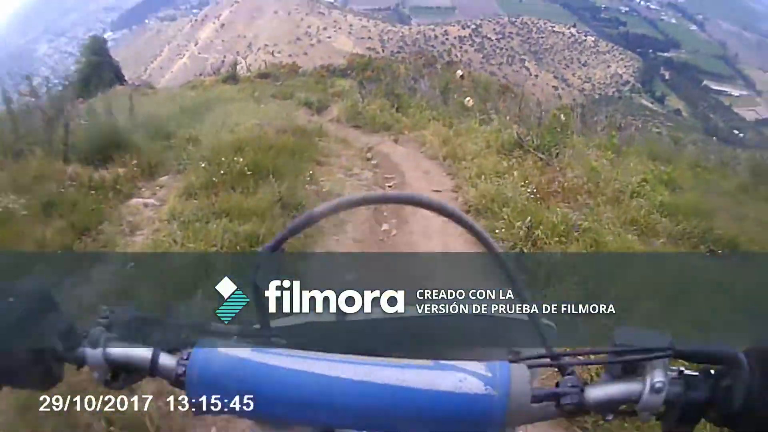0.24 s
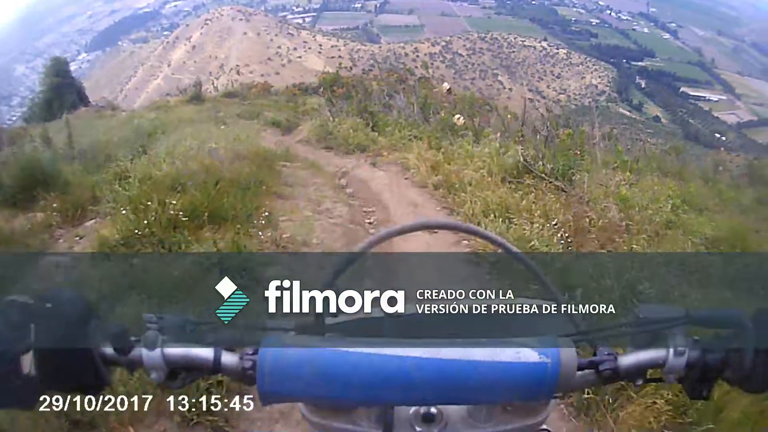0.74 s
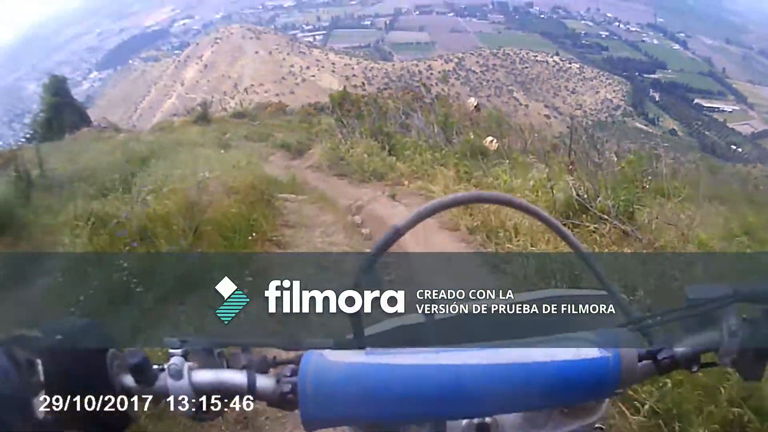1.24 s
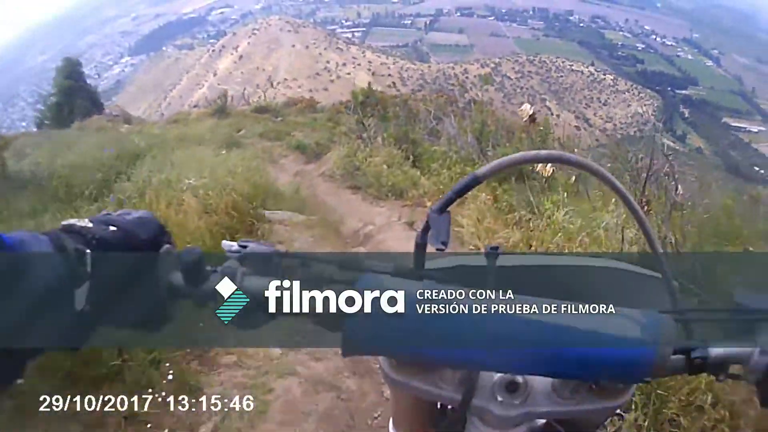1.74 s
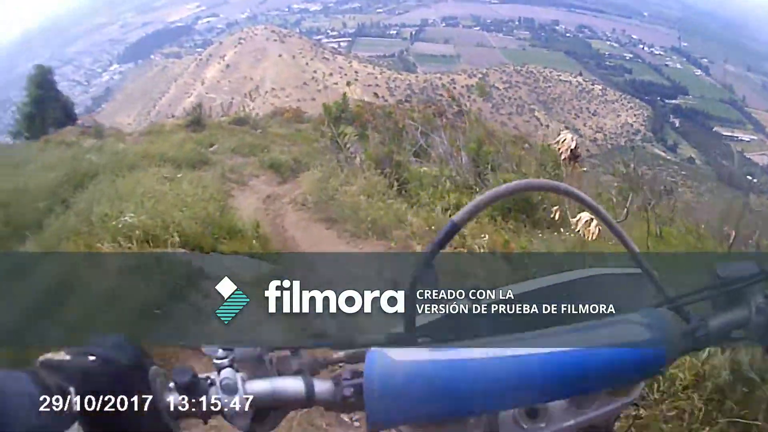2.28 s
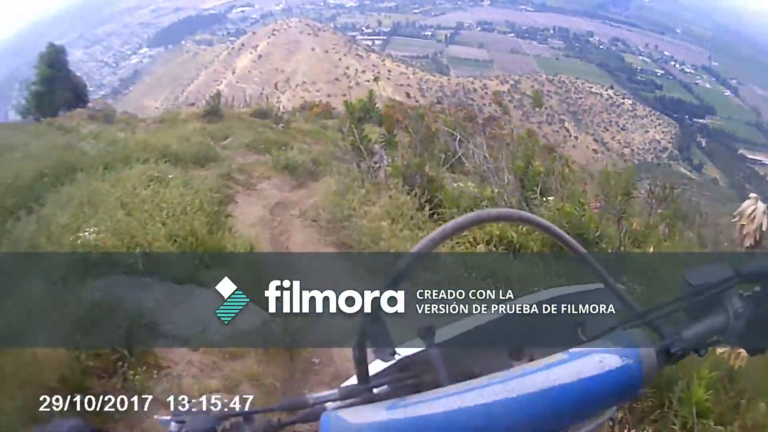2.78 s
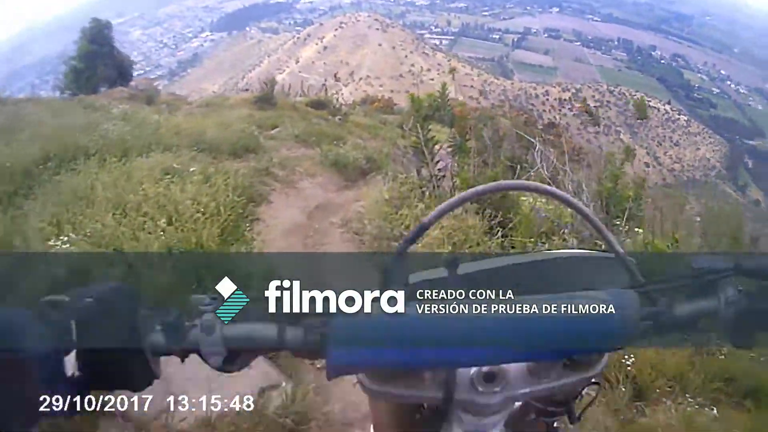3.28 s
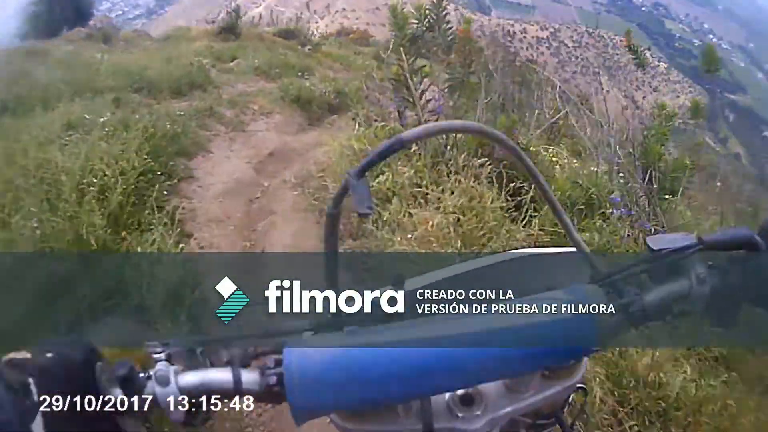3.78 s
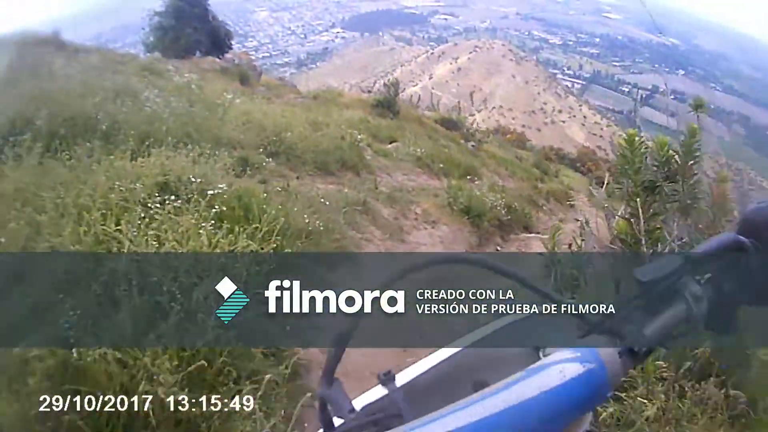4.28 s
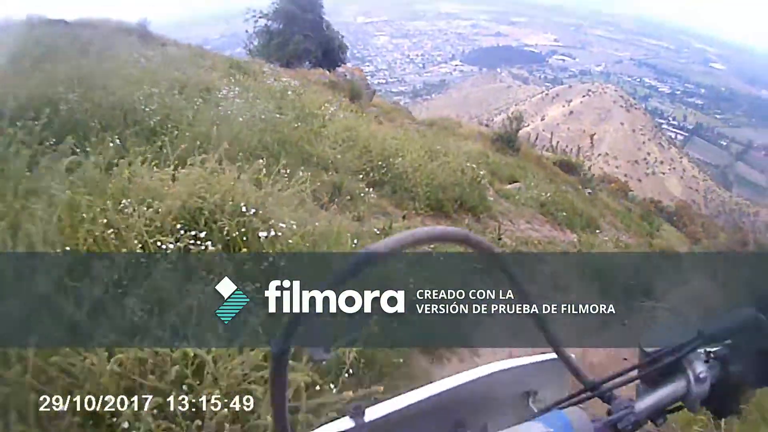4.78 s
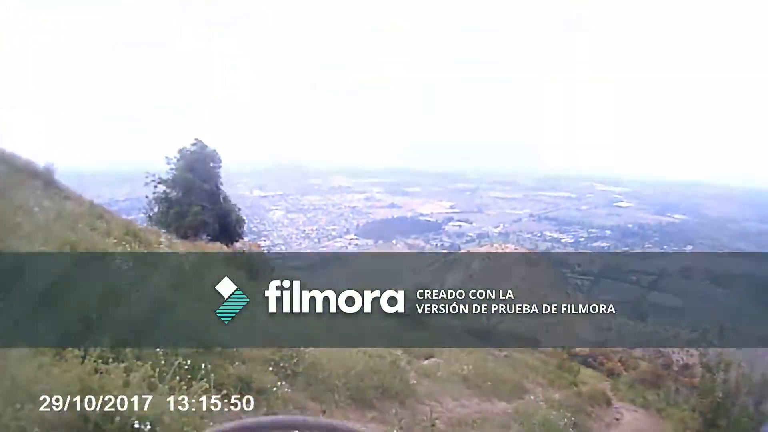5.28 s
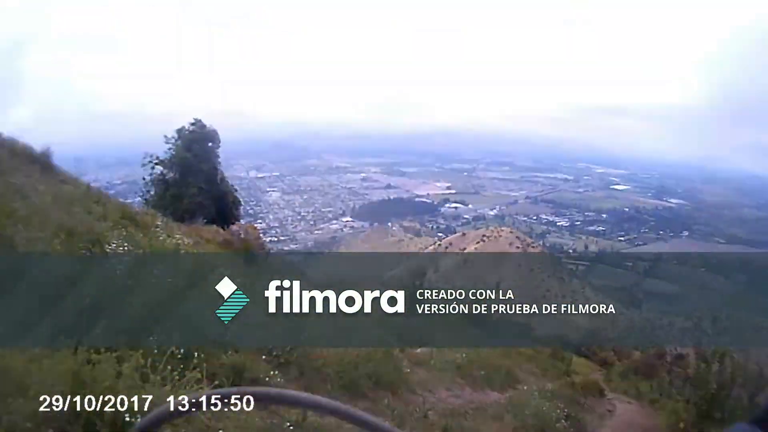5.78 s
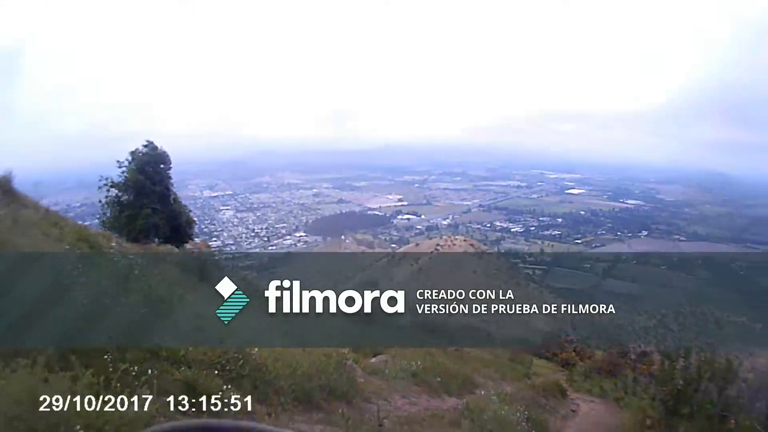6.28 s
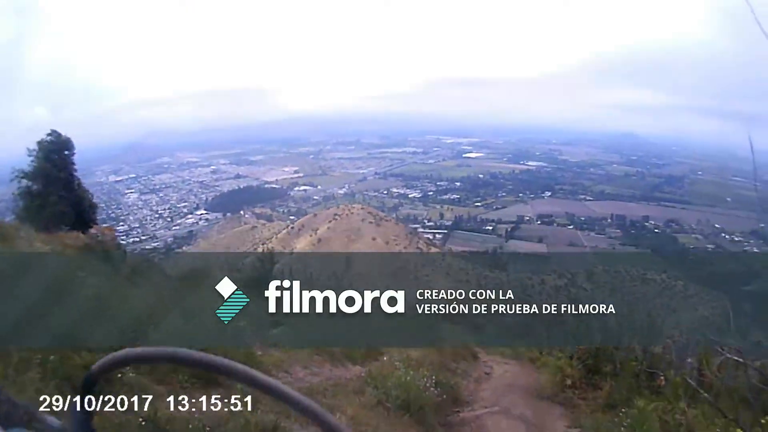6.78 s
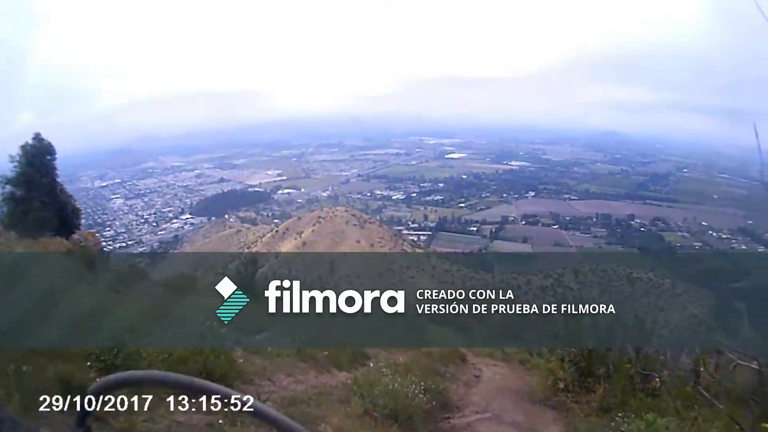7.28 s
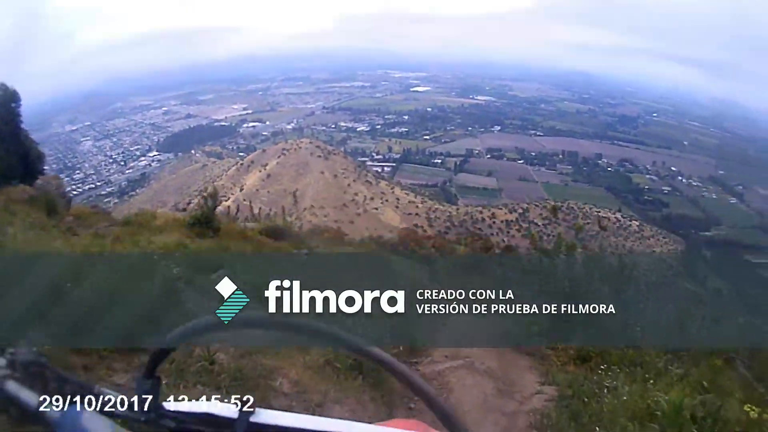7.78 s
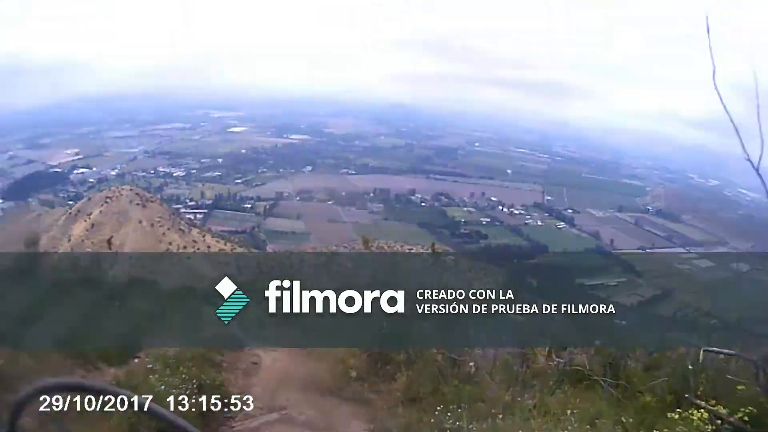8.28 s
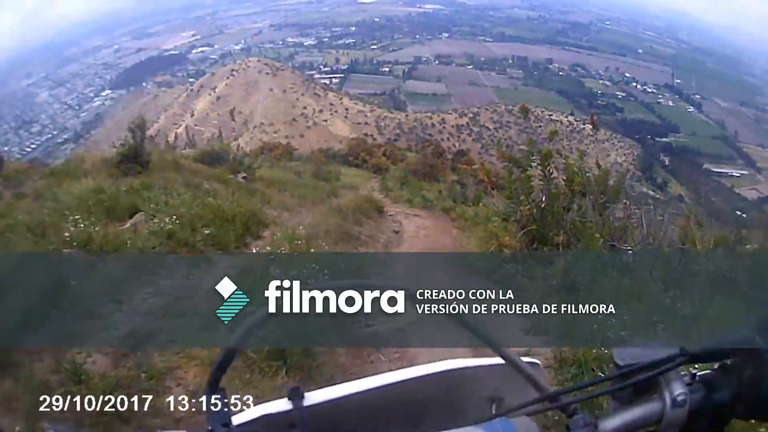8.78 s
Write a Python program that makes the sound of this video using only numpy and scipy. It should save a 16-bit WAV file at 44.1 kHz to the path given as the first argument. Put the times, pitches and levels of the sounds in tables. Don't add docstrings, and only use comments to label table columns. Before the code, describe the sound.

A single-cylinder dirt bike putters at idle down a rough outdoor trail, picked up closely through a sealed plastic camera case. Throughout, about eighteen low exhaust thuds per second wander slightly and sometimes weaken, under boxy, metallic valve clatter, low mount rumble and soft hiss. Light ticks and a strap scuff begin at 0.1 s; snaps at 0.63 s lead to the loudest crack and deep thump at 0.77 s. From 1 to 2 s there are scuffs, ticks and short squeaks. A bump at 2.3 s knocks and chirps; a duller landing comes at 2.9 s. From 3 to 5 s it is calmer, mostly engine with small jolts. At 5.3 s a heavy thump and sharp double knock hit. A small squeak at 6.05 s and a milder bump near 6.5 s follow, then frequent light ticks and rubs from 7.4 s until the end at 9 s, engine still running.

```python
import sys
import numpy as np
from scipy import signal
from scipy.fft import rfft, irfft, next_fast_len
from scipy.io import wavfile
from scipy.ndimage import uniform_filter1d

SR = 44100
rng = np.random.default_rng(int(sys.argv[2]) if len(sys.argv) > 2 else 0)


def store_pcm(level_fs):
    pcm = np.round(np.clip(level_fs, -1, 1) * 32767).astype(np.int16)
    wavfile.write(sys.argv[1], SR, np.atleast_2d(pcm).T)


def nominal_scale(level):
    x = np.asarray(level, float) / 20
    return 10 ** x


N = 398663

# pitch in Hz, width in Hz, level in dB.
CASE_TONES = [(540, 470, -6), (970, 340, -4.5), (1180, 187, 5), (1390, 690, -4), (1880, 198, 6),
              (2153, 610, -5.5), (3107, 226, -13.5), (3610, 490, -17.5), (3943, 310, -14), (4810, 300, -20),
              (6160, 910, -31)]
# time in seconds, level in dB, extra brightness in dB.
CLATTER_COURSE = [(0.0, -66, 2.5), (0.88, -64, 4.5), (1.36, -66, 3), (1.76, -64, 4), (2.04, -67, 1),
                  (2.29, -64, -1), (2.54, -68.5, 3), (3.95, -67.5, 4), (4.23, -68.5, 4.5), (5.03, -67, 4.5),
                  (5.21, -65.5, 4), (5.89, -65.5, 3), (6.42, -63.5, 3.5), (6.77, -66, 3),
                  (7.85, -63.5, 1.5), (8.38, -65.5, 5), (9.04, -65, 3)]


def read(points, hz):
    f, value = np.transpose(points)
    return np.interp(np.log(hz + 1), np.log(f + 1), value)


def curves(table):
    s, *columns = np.transpose(table)
    return [np.interp(np.arange(N) / SR, s, column) for column in columns]


def evened(x):
    return x / np.sqrt(np.mean(x ** 2) + 1e-20)


def noise(spectrum):
    size = next_fast_len(N)
    white = rfft(rng.standard_normal(size))
    gain = nominal_scale(read(spectrum, np.fft.rfftfreq(size, 1 / SR)))
    return evened(irfft(white * gain, size)[:N])


def add(mix, s, sound):
    part = mix[max(round(s * SR), 0):][:len(sound)]
    part += sound[:len(part)]


def resonate(x, hz, width):
    r, turn = np.exp(-np.pi * width / SR), np.exp(2j * np.pi * hz / SR)
    return 2 * signal.lfilter([1 - r], [1, -r * turn], x).real


def resonate_twice(x, hz, width, second_width):
    return resonate(resonate(x, hz, width), hz, second_width)


def case(x, low_db, high_db):
    out = 0
    for k, (hz, width, db) in enumerate(CASE_TONES):
        weight_db = low_db if hz < 2700 else high_db
        out = out + (-1) ** k * nominal_scale(db + weight_db) * resonate_twice(x, hz, width, width)
    return out


def crank():
    # time in seconds, firings per second, firing strength in dB.
    idle = [(0, 18.444, .5), (.506, 18.208, 2), (1.109, 19.034, .5), (2.102, 18.055, .5),
            (2.328, 19.371, -.5), (2.603, 18.416, -1), (3.126, 17.858, -.5), (3.926, 19.125, -.5),
            (4.655, 17.561, .5), (5.036, 19.365, 0), (5.457, 18.305, -.5), (5.57, 18.892, 0),
            (6.62, 18.55, 1), (6.665, 18.245, 1), (7.629, 19.3, -.5), (8.36, 17.713, 0), (8.534, 19.398, 0),
            (9.04, 18.565, .5)]
    rate, strength_db = curves(idle)
    return -1.147 + np.cumsum(rate) / SR, strength_db


def exhaust(spread_db=1., lead_s=0.0029):
    # firing number, change in dB.
    misfires = [(1, -16), (27, -22), (40, -9), (47, -5), (58, -4), (63, -4), (70, -4), (81, -5), (96, -4),
                (104, -9), (121, -25), (125, -3), (148, -22)]
    # pitch in Hz, level in dB, time to fade by 60 dB in seconds,
    # direction of the first swing (+1 or -1), arrival delay in seconds.
    pipe = [(65, -53, .15, -1, .004), (88, -46, .095, 1, .003), (214, -51, .047, 1, .0007),
            (311, -46, .09, -1, .0011), (336, -45, .05, -1, .0002), (500, -65, .06, -1, -.013)]
    count, firing_db = crank()
    s, k = np.arange(N) / SR, np.arange(np.ceil(count[0]), count[-1])
    weakness = dict(misfires)
    strength_db = np.interp(k, count, firing_db) + np.array([weakness.get(int(n), 0) for n in k])
    firing_s = np.interp(k, count, s) - lead_s
    t = np.arange(SR // 5) / SR
    low, high = np.zeros((2, N))
    for hz, db, t60, direction, delay in pipe:
        kicks = np.zeros(N)
        at = np.clip((firing_s + delay) * SR, 0, N - 1).astype(int)
        kicks[at] = nominal_scale(strength_db + spread_db * rng.standard_normal(len(k)))
        fade = direction * nominal_scale(db + 0.76 - 60 * t / t60)
        ring = fade * (1 - np.exp(-t / 0.00014)) * np.sin(2 * np.pi * hz * t)
        part = high if hz > 400 else low
        part += signal.oaconvolve(kicks, ring)[:N]
    muffler = signal.butter(3, 410, fs=SR, output="sos")
    return signal.sosfiltfilt(muffler, low) + high


def clatter(grains_per_s=3500, grain_db=0.9, flutter_db=1.0, patch_db=1.6):
    # share of the cycle after the exhaust thud, level in dB.
    valves = [(0, -5.5), (.15, -4), (.35, -3.5), (.45, -4.5), (.62, -8), (.66, -5), (.85, -1), (1, -5.5)]
    level_db, bright_db = curves(CLATTER_COURSE)
    cycle_db = np.interp(crank()[0] % 1, *np.transpose(valves))
    hit_size = nominal_scale(grain_db * np.minimum(rng.exponential(1, N), 5))
    grains = rng.standard_normal(N) * hit_size * (rng.random(N) < grains_per_s / SR)
    steps = np.arange(0, N + 400, 200)

    def waver():
        slow = uniform_filter1d(rng.standard_normal(len(steps)), size=5)
        return np.interp(np.arange(N), steps, evened(slow))

    drive = 0.54 * evened(grains) + rng.standard_normal(N)
    drive = drive * nominal_scale(cycle_db + flutter_db * waver())
    rings = np.zeros(N)
    for k, (hz, width, db) in enumerate(CASE_TONES):
        tone = resonate_twice(drive * nominal_scale(patch_db * waver()), hz, width, width)
        rings += (-1) ** k * nominal_scale(db + (hz > 2700) * bright_db) * tone
    return nominal_scale(level_db + 0.5) * evened(rings)


def tappets(spread_db=1.5, jitter=.01, burst_s=.007):
    # share of the cycle, pitch in Hz, width in Hz, level in dB.
    taps = [
        (0.658, 1162, 131, -66.5),
        (0.721, 1880, 131, -69.5),
        (.93, 900, 203, -73.5),
        (0.949, 623, 199, -69),
    ]
    count, out = crank()[0], np.zeros(N)
    k, t = np.arange(0, count[-1] - 1), np.arange(900) / SR
    level_db = curves(CLATTER_COURSE)[0]
    for share, hz, width, db in taps:
        size, late = rng.standard_normal((2, len(k)))
        kicks = np.zeros(N)
        at = np.searchsorted(count, k + share + jitter * late).clip(0, N - 1)
        kicks[at] = nominal_scale(spread_db * size)
        bursts = signal.oaconvolve(kicks, np.exp(-t / burst_s))[:N] * rng.standard_normal(N)
        out += nominal_scale(db) * evened(resonate_twice(bursts, hz, width, 3 * width))
    return out * nominal_scale(level_db - level_db.mean() - 9)


def shake(shudder_base_db=-57.5, shudder_follow=0.23, bump_fade_db=30):
    # pitch in Hz, level in dB per Hz.
    sway_colour = [(2.4, -27), (4.0, 0), (16, 6.5), (25, -4), (41, -7.5), (60, -33), (78, -61), (130, -120)]
    shudder_colour = [(30, -32), (50, 1), (100, -6.5), (140, -12), (185, -19.5), (400, -25), (800, -41),
                      (1500, -76)]
    # time in seconds, steady sway in dB.
    trail = [(0, -42.5), (.9, -42), (1.5, -38), (2, -47.5), (2.6, -59.5), (3.5, -46), (4.2, -52.5),
             (4.8, -40.5), (5.6, -54.5), (5.9, -51.5), (6.7, -46.5), (7.6, -38.5), (8.5, -37.5),
             (8.8, -48.5), (9.04, -42)]
    # time of the peak in seconds, sway in dB, shudder in dB,
    # half length in seconds.
    bumps = [(0.287, -32, -55.5, 0.087), (0.41, -47, -59, .04), (0.472, -33, -78, 0.1),
             (0.633, -35, -52, 0.04), (0.758, -33, -38.5, 0.11), (0.777, -39, -58, 0.068),
             (0.895, -32, -53, 0.12), (1.125, -44, -51.5, 0.13), (1.283, -33.5, -65, 0.16),
             (1.69, -38, -52, 0.058), (1.778, -43, -48, 0.1), (1.838, -42, -59, 0.05),
             (1.942, -33, -57, 0.12), (2.277, -36, -51, 0.093), (2.386, -37.5, -67, 0.36),
             (4.248, -38, -67, 0.04), (4.388, -35.5, -46, 0.052), (4.59, -39, -53, 0.067),
             (4.911, -28, -62, 0.041), (5.05, -34, -76, 0.036), (5.297, -27, -42, 0.1),
             (5.415, -33.5, -55, 0.6), (6.032, -38, -62, 0.2), (6.26, -36.5, -61, 0.18),
             (6.455, -34.5, -55, 0.15), (6.908, -33, -64, 0.076), (7.048, -39, -61, 0.083),
             (7.153, -31.5, -59, 0.061), (7.378, -42, -50, 0.04), (7.517, -38, -76, 0.044)]
    trail_db = curves(trail)[0]
    sway = nominal_scale(trail_db)
    shudder = nominal_scale(shudder_base_db + shudder_follow * (trail_db - trail_db.mean()))
    for s, sway_db, shudder_db, half in bumps:
        t = np.arange(-min(s, 2 * half), 2 * half, 1 / SR)
        fade_db = bump_fade_db * abs(t) / half
        add(sway, s + t[0], nominal_scale(sway_db - fade_db))
        add(shudder, s + t[0], nominal_scale(shudder_db - fade_db))
    return sway * noise(sway_colour) + shudder * noise(shudder_colour)


def scuffs():
    # start in seconds, length in seconds, level in dB, pitch of the upper band in Hz.
    rubs = [(0.129, 0.067, -64, 3600), (0.675, 0.021, -59.5, 3950), (1.074, 0.078, -61, 3480),
            (1.143, 0.017, -62, 3880), (1.18, 0.009, -68, 3900), (1.22, 0.016, -65.5, 3900),
            (1.398, 0.015, -61, 3780), (1.516, 0.031, -64, 3700), (1.789, 0.037, -61.5, 3520),
            (1.862, 0.052, -62.5, 3600), (2.009, 0.042, -70, 3500), (2.317, 0.059, -66, 1650),
            (2.345, 0.024, -72, 3200), (3.35, 0.087, -67, 1200), (4.049, 0.08, -77, 1440),
            (4.931, 0.1, -76, 3730), (5.202, 0.15, -68, 3950), (5.344, 0.063, -67, 3600),
            (6.166, 0.08, -62.5, 3480), (7.38, 0.053, -66, 3600), (7.669, 0.029, -63.5, 3600),
            (7.806, 0.094, -64.5, 3520), (8.287, 0.054, -67, 3330), (8.843, 0.088, -69, 3800)]
    out = np.zeros(N)
    for s, length, db, hz in rubs:
        size = min(round(length * SR), 6000)
        rub = rng.standard_normal(size) * np.hanning(size) ** 0.25
        band = resonate_twice(rub, hz, 700, 800)
        add(out, s, nominal_scale(db) * evened(band + 1.8 * case(rub, 0, 1)))
    return out


def ticks():
    # start in seconds, peak level in dB, pitch in Hz.
    taps = [(0.1302, -46, 1850), (0.209, -55, 1880), (0.266, -45, 1330), (0.485, -51, 970),
            (0.665, -47, 1990), (0.677, -45, 1870), (0.9138, -45, 1100), (.9657, -49, 1910),
            (1.074, -45, 1180), (1.1425, -54.5, 5900), (1.3367, -47, 1140), (1.3737, -40.5, 1870),
            (1.496, -49, 1340), (1.6067, -59, 1380), (1.778, -48, 1880), (1.8754, -46, 1290),
            (1.988, -49, 1180), (2.2074, -57, 1230), (2.3164, -50, 1730), (2.325, -48, 1670),
            (2.695, -51, 1910), (2.9644, -49, 1130), (3.0736, -49, 1910), (3.182, -56, 1160),
            (3.2388, -55, 1900), (4.083, -47, 1450), (4.593, -52, 1170), (4.811, -57, 1160),
            (5.336, -52, 1900), (5.562, -48, 1880), (6.1953, -48, 1220), (6.25, -44, 1850),
            (6.3051, -53, 1860), (6.4327, -50, 1880), (6.523, -43, 1770), (6.7361, -57, 1880),
            (6.902, -50, 1210), (6.9558, -49, 1890), (7.008, -52, 1250), (7.17, -50, 1890),
            (7.409, -48, 1180), (7.428, -46, 870), (7.5163, -44.5, 1870), (7.6765, -51, 1150),
            (7.72, -57, 1870), (7.777, -46, 1870), (7.804, -45, 1890), (7.8346, -52, 1890),
            (7.86, -54, 1120), (7.934, -45, 1870), (7.9726, -42.5, 1870), (8.011, -46, 1150),
            (8.1234, -64, 1140), (8.2865, -49, 1900), (8.3964, -43.5, 1150), (8.765, -48.5, 1140),
            (8.93, -46, 1840), (8.977, -46, 1125)]
    out, t = np.zeros(N), np.arange(1300) / SR
    for s, db, hz in taps:
        blow = (rng.standard_normal(len(t)) + 9 * (t == 0)) * np.exp(-t / 0.0087)
        ring = resonate_twice(blow, hz, 150, 900) + 0.47 * case(blow, -8, 0)
        add(out, s, nominal_scale(db - 6.0) * ring / abs(ring).max())
    return out


def jolts():
    # time of the peak in seconds,
    # level in dB, pitch in Hz, number of cycles, direction and size.
    mount_jolts = [(0.393, -42, 90, 2.1, 1), (0.7729, -15.5, 69.6, 1.13, -1.06), (.758, -27, 40, 2.3, 1),
                   (0.733, -13.5, 22.8, 2.2, -0.81), (.808, -21, 22, 1.6, -1), (0.884, -20, 88, 1.6, 0.63),
                   (1.841, -45, 70, 1.3, 0.83), (2.271, -25, 76, 1.2, -0.73), (2.342, -25, 117, 2.5, 0.53),
                   (4.136, -35, 83, 1.9, 0.81), (4.408, -37.5, 110, 3.2, 0.94),
                   (5.301, -15, 55, 1.1, -1.15), (5.312, -20, 100, 2.7, -0.88),
                   (5.2925, -28.5, 507, 6.5, 0.61), (5.297, -31, 246, 2.6, -0.84),
                   (4.57, -34, 81, 2.9, 0.83), (5.488, -34, 70, 1.1, -1.06), (5.835, -32.5, 104, 2.9, 1),
                   (6.257, -29.5, 94, 2.7, -1.12), (6.266, -26, 94, 0.98, -0.29),
                   (6.385, -57, 80, 1.5, 0.45), (6.542, -43, 110, 1.4, -0.86), (7.443, -48, 120, 2.9, 0.99),
                   (7.655, -43.5, 110, 3.2, 1), (7.733, -34.5, 83.5, 1.8, -1.2),
                   (8.333, -40, 91, 1.4, -1.2)]
    more_jolts = [(0.784, -23, 30, 1.3, 1), (0.863, -29.5, 6.6, 0.67, 1), (0.909, -24.5, 21, 1.9, -0.95),
                  (.769, -21, 170, 1.5, 0.8), (1.29, -33, 15, 2.9, -0.68), (1.318, -29, 13, 1.2, 0.92),
                  (1.683, -25.5, 19.6, 2.2, 1), (1.809, -28.5, 22, 1.3, -1), (1.836, -27.5, 25, 1., 0.92),
                  (2.285, -22, 19, 0.83, -1), (2.335, -33.5, 5.8, 0.86, 1), (2.39, -30.5, 10, 1.8, -1),
                  (5.279, -22.5, 25, 1.8, 0.92), (5.292, -20, 57, 0.89, 1), (5.308, -20, 106, 1.2, 0.92),
                  (6.044, -32, 29.5, 3.4, 1), (6.466, -28, 16, 0.87, -1.05), (6.486, -35, 15, 1.3, 0.89)]
    out, t = np.zeros(N), np.arange(-2600, 2600) / SR
    for s, db, hz, cycles, direction in [*mount_jolts, *more_jolts]:
        swell = np.exp(-(3.81 * hz * t / cycles) ** 2)
        add(out, s + t[0], direction * nominal_scale(db) * np.cos(2 * np.pi * hz * t) * swell)
    return out


def knocks():
    # pitch in Hz, level in dB,
    # time to fade by 60 dB in seconds, direction and size of the first swing.
    snap_tones = [(954, -7.5, 0.02, 1), (1850, 6, 0.0084, -1.16), (2520, 2.5, 0.0096, 1),
                  (3600, -6, 0.014, -0.98), (4100, -1.5, 0.0095, 0.73), (4700, -15, 0.0055, -1),
                  (5250, -3.5, 0.0057, 0.9), (7750, -33, .003, 0.9)]
    thud_tones = [(282, -2, 0.066, 1), (465, -1, 0.03, -0.84), (850, -2.5, 0.049, 0.76),
                  (1250, -5, 0.029, -1.16), (1646, 2, 0.018, 1), (1870, 1, 0.024, -0.76),
                  (2620, -18, 0.013, 1), (3700, -16, 0.0081, -0.82)]
    crack_tones = [(560, -12.5, 0.012, -0.88), (944, -13, 0.017, 0.96), (1230, -1.5, 0.013, -1.04),
                   (1850, 4, 0.01, 1), (2070, 2, 0.0086, -1.02), (2700, -14, 0.019, 0.76),
                   (3060, -9.5, 0.025, 0.77), (3700, -28, 0.017, -0.67), (3950, -20, 0.025, -0.94),
                   (4360, -28, 0.012, 0.86), (4840, -28, 0.007, -0.65), (6100, -28, 0.01, 1),
                   (6930, -37, 0.0074, 1), (8300, -30, 0.0042, 1)]
    # start in seconds, peak level in dB, tilt to the treble in dB per octave,
    # rise in milliseconds, ring length as a factor.
    snaps = [(0.6297, -29.5, 4.5, 0.24, 0.71), (0.6356, -33.5, -0.5, 0.17, 0.63), (.6375, -41, 0, 0.22, 1),
             (0.6414, -38, 2, 0.15, 0.9), (1.372, -52, 6, 0.3, 1), (2.2929, -33, -4, 0.15, 0.9),
             (5.3027, -32, -2.5, 0.15, 0.56), (5.3107, -26, 4.5, 0.13, 0.75), (5.306, -45, -1, .3, 1),
             (5.3135, -45, 4, .3, 1), (5.33, -37, -6, 0.15, 0.83), (6.4737, -44.5, -5, 0.15, 0.97)]
    thuds = [
        (2.335, -41.5, -4, 1.2, 0.69),
        (2.8805, -37.5, 2, 1.2, 1.2),
        (2.883, -30.5, 3.5, 0.98, 0.54),
        (5.2893, -32, 2, 0.65, 0.28),
        (5.2925, -32, 9, 0.6, 0.5),
        (5.3145, -38, -3, .5, 0.95),
    ]
    cracks = [
        (.7669, -21, -6.5, 0.81, 0.98),
        (.7683, -32, -5, 0.37, 0.83),
        (.7691, -13, 2.5, 0.41, 1),
        (.7718, -33, 7, 0.33, 0.65),
        (.7757, -40, -1, .7, 0.9),
    ]
    out, t = np.zeros(N), np.arange(2600) / SR
    for events, tones in ((snaps, snap_tones), (thuds, thud_tones), (cracks, crack_tones)):
        hz, tone_db, t60, direction = np.transpose(tones)[:, :, None]
        for s, db, tilt_db, ms, length in events:
            detune = 1 + 0.006 * rng.standard_normal((len(tones), 1))
            level = direction * nominal_scale(tone_db + tilt_db * np.log2(hz / 1900) - 60 * t / t60 / length)
            ring = (level * np.sin(2 * np.pi * hz * detune * t)).sum(0)
            ring = ring * (1 - np.exp(-t * 1000 / max(ms, .02)))
            spit = resonate(np.diff(rng.standard_normal(len(t) + 1)), 6500, 7000)
            spit = spit * np.exp(-t / 0.0018) * np.minimum(t / 0.00096, 1)
            spit_db = 0.93 * tilt_db - 33.5 - 13 * ms
            add(out, s, nominal_scale(db) * (ring / abs(ring).max() + nominal_scale(spit_db) * spit))
    return out


def swishes():
    # start in seconds, length in seconds, level in dB, pitch in Hz, width in Hz.
    brushes = [(.7705, 0.0075, -46, 3300, 1200), (.776, 0.011, -67, 3500, 900),
               (2.338, 0.0075, -52, 554, 200), (5.288, 0.0128, -52, 560, 250),
               (5.316, .012, -61, 1000, 700), (1.08, 0.062, -65, 3480, 500), (1.148, .012, -74, 3820, 400),
               (1.795, .04, -74, 3700, 300), (1.87, 0.05, -68, 3280, 700), (2.013, 0.015, -72, 3600, 400),
               (2.322, 0.05, -61, 1660, 200), (2.338, .02, -73, 3200, 300), (4.94, .13, -75, 3700, 300),
               (5.018, .12, -82, 5500, 900), (5.312, 0.01, -58, 950, 500)]
    out = np.zeros(N)
    for s, length, db, hz, width in brushes:
        rub = rng.standard_normal(min(round(length * SR), 7000))
        band = evened(resonate_twice(rub, hz, width, 2 * width))
        add(out, s, nominal_scale(db) * band * np.hanning(len(rub)) ** 0.49)
    return out


def squeaks():
    # start in seconds, length in seconds, pitch in Hz, level in dB.
    rubs = [
        (1.372, 0.034, 3060, -69),
        (1.645, 0.024, 1390, -54),
        (1.74, 0.023, 1330, -57),
        (1.788, 0.024, 1390, -50.5),
        (2.322, .01, 1720, -55),
        (2.334, 0.0081, 1670, -47.5),
        (5.226, 0.038, 1426, -63),
        (6.049, 0.051, 1390, -58.5),
        (8.169, 0.043, 1410, -63),
    ]
    out = np.zeros(N)
    for s, length, hz, db in rubs:
        t = np.arange(0, length, 1 / SR)
        tone = np.sin(2 * np.pi * hz * (t - .12 * t ** 2))
        add(out, s, nominal_scale(db) * tone * np.sin(np.pi * t / length))
    return out


def scene():
    engine = exhaust() + clatter() + tappets()
    mount = shake() + jolts() + knocks()
    small_sounds = scuffs() + ticks() + swishes() + squeaks()
    return (engine + mount + small_sounds)[None]


def roll_off(x):
    return signal.sosfilt(signal.butter(12, 15745, fs=SR, output="sos"), x)


def record(dry):
    # pitch in Hz, level in dB per Hz.
    hiss = [(200, 16.5), (2000, 0), (5000, -1), (8000, -3.5), (12000, -7), (15000, -9.5), (15550, -18),
            (15800, -76)]
    hiss_db, offset = -70.5, .0037
    return roll_off(dry + nominal_scale(hiss_db) * noise(hiss) + offset)


dry = scene()
out = record(dry)
store_pcm(out)
```